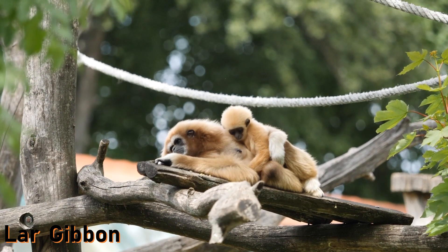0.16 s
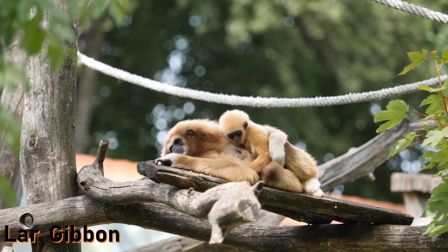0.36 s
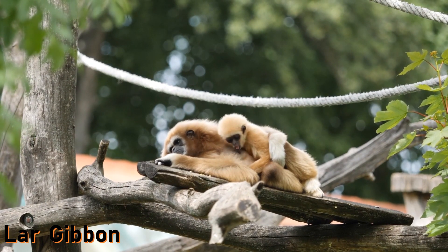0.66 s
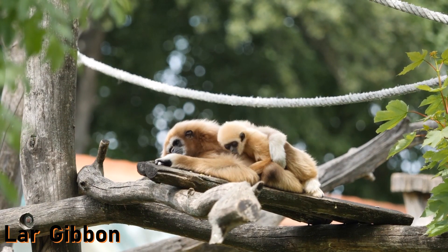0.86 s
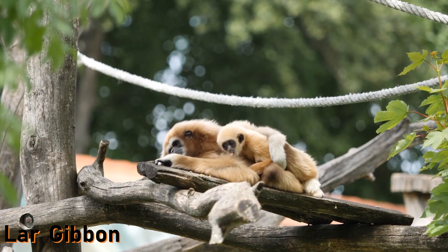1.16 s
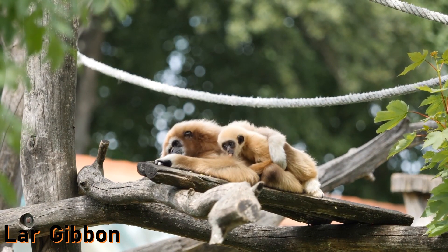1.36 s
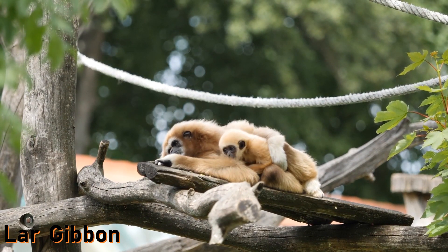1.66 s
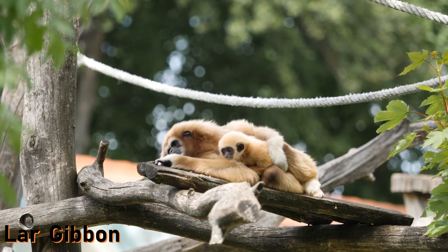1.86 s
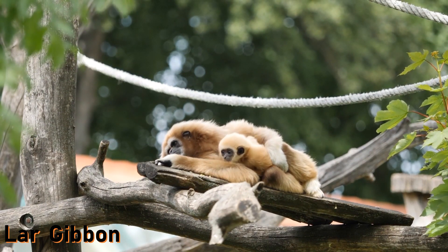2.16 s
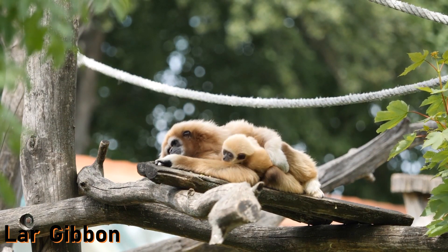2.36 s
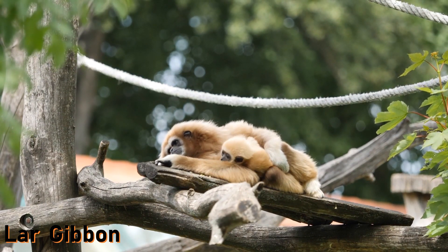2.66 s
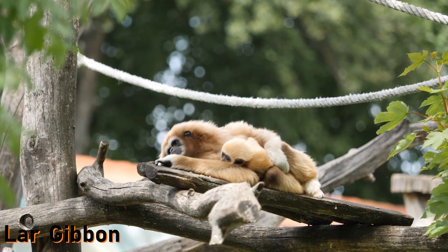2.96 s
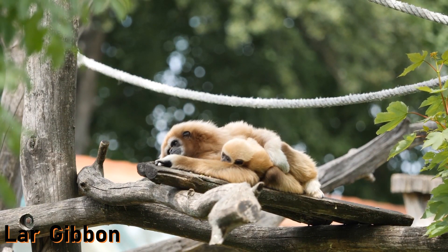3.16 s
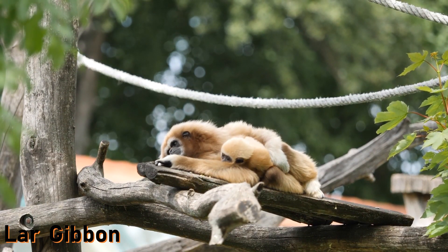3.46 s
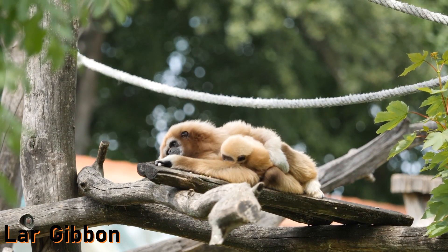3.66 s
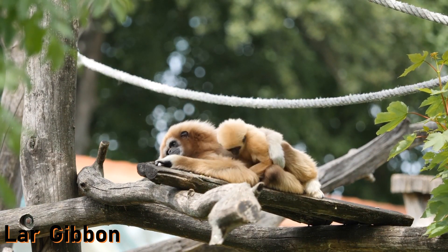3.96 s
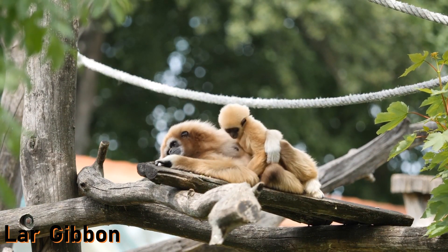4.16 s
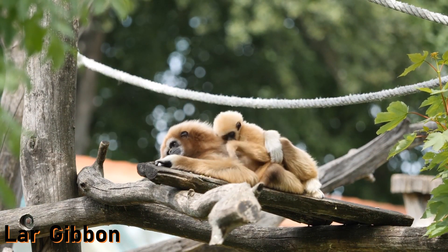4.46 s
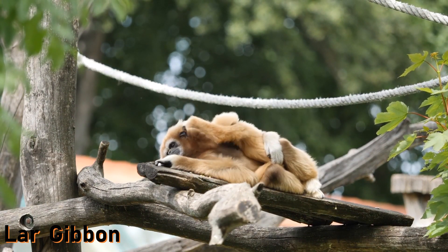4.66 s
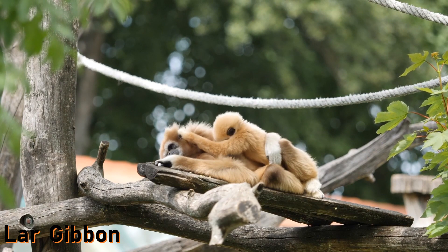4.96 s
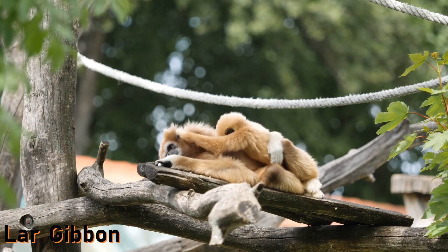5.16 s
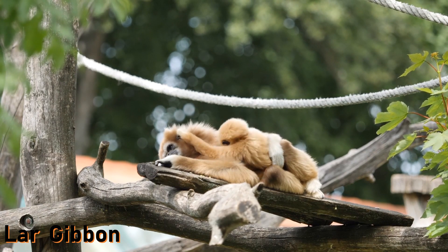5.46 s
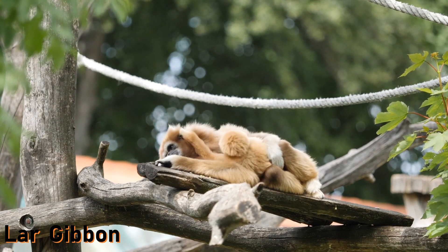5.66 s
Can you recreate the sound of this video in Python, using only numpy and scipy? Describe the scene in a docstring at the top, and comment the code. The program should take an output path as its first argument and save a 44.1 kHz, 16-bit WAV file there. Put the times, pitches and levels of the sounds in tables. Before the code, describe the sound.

Close stereo pickup of a single ape calling outdoors. Soft, low hoots come about four a second with hoarse in-breaths in the gaps; they swell, then break into loud rising-and-falling whoops with rough, noisy overtones. Near the end the calls drop abruptly to quiet, low hoots that slowly strengthen again. A weak wavering hum and rumble lie beneath.

```python
"""The end of a rasping inward pant over a low hum and rumble, then an ape close by gives fast, soft arched hoots.
They build up to a run of high, harsh whoops and fall back to hoots, with rasping pants between the notes.
Hoots and whoops are fold harmonics and noise through mouth resonances; pants are noise over a slow rattle.
The hum is a wavering cosine, the rumble filtered noise, and nearby surfaces add faint reflections."""
import sys
import numpy as np
from scipy import signal
from scipy.fft import rfft, irfft
from scipy.io import wavfile
from scipy.ndimage import uniform_filter1d

SR = 44100
rng = np.random.default_rng(int(sys.argv[2]) if len(sys.argv) > 2 else 0)


def dump_mix(stems):
    """Bounce the given channels to the path in sys.argv[1] as a 16-bit WAV at rate SR."""
    frames = np.atleast_2d(stems).T  # one column per channel
    limited = np.clip(frames, -1, 1)  # hard clip at full scale
    pcm = np.round(limited * 32767).astype(np.int16)
    wavfile.write(sys.argv[1], SR, pcm)


N = 256662
T = np.arange(N) / SR  # seconds


def undb(db):
    """Decibels to gain."""
    return 10 ** (np.asarray(db) / 20)


def colour(x, points):
    """Causal (minimum-phase) filter through (Hz, dB) points, joined on a log frequency scale."""
    hz, db = np.transpose(points)
    grid = np.maximum(np.fft.rfftfreq(4096, 1 / SR), 1)
    cepstrum = irfft(np.log(undb(np.interp(np.log(grid), np.log(hz), db))))
    half = len(cepstrum) // 2
    # folding the cepstrum forward in time makes the filter causal
    folded = np.r_[cepstrum[0], 2 * cepstrum[1:half], np.zeros(half)]
    impulse = irfft(np.exp(rfft(folded)))[:half]
    return signal.fftconvolve(x, impulse)[:N]


def cut(x, hz, kind, order=4):
    """Butterworth low- or high-pass."""
    return signal.sosfilt(signal.butter(order, hz, kind, fs=SR, output="sos"), x)


def unit(x):
    """Scale to a standard deviation of 1."""
    return x / np.std(x)


def steady(x, seconds):
    """Hold the running rms near 1."""
    size = int(seconds * SR) + 1
    power = uniform_filter1d(uniform_filter1d(x * x, size), size)
    return x / np.sqrt(np.abs(power) + 1e-12)


def noise():
    """White noise."""
    return rng.standard_normal(N)


def wander(hz):
    """Random motion mostly slower than hz, spread 1."""
    return unit(cut(noise(), hz, "low", order=2))


def pan(left_db):
    """Left and right gains that differ by left_db."""
    return undb(np.array([[1], [-1]]) * left_db / 2)


def notes(table):
    """The columns of the nearest note at every moment, its start and end first."""
    rows = np.array(table, float)
    halfway = (rows[1:, 0] + rows[:-1, 1]) / 2
    return rows[np.searchsorted(halfway, T)].T


def gate(db, start, end, fade_s):
    """Gain of a level that sounds only from the start to the end of each note, with softened edges."""
    sounding = (T >= start) & (T <= end)
    return uniform_filter1d(undb(db) * sounding, int(fade_s * SR) + 1)


def off_crest(progress, crest):
    """Distance from the crest of a note: 0 there, 1 at both ends."""
    return np.maximum((crest - progress) / crest, (progress - crest) / (1 - crest))


def cycle(hz, jitter):
    """Phase of an oscillator whose pitch trembles by jitter, a share of the pitch."""
    return 2 * np.pi * np.cumsum(hz * (1 + jitter * wander(196))) / SR


def folds(phase, slope_db, first=1, count=14, smear=0):
    """Vocal fold pulses as harmonics tilted by slope_db an octave; smear spreads each pulse over its cycle."""
    return sum(undb(slope_db * np.log2(k)) * np.cos(k * phase + smear * k * k)
               for k in range(first, count))


def two_bands(x, throat, mouth, split_hz, hold_s):
    """The resonances below and above split_hz, each levelled and given its own strength."""
    low = steady(cut(x, split_hz, "low", order=8), hold_s)
    high = steady(cut(x, split_hz, "high", order=8), hold_s)
    return throat * low + mouth * high


def air(phase, spectrum, pulsing):
    """Turbulence that puffs once a cycle."""
    return unit(colour(noise() * (1 + pulsing * np.cos(phase)), spectrum))


# Low hum. Each row: time in seconds, pitch in Hz, level in dB.
HUM_PATH = [(0,121,-32),(0.402,84.6,-53.5),(1.2,77.56,-43.5),(1.8,77,-36),(2.35,77.5,-35),(2.7,77.83,-50),(2.901,78.36,-35.5),(3.3,81.43,-39.5),(3.6,78.76,-52.5),(5.82,92,-47)]
# Swell of the rumble. Each row: time in seconds, relative level in dB.
RUMBLE_SWELL = [(.4,-39),(1.7,-47.5),(3.3,-46),(4.4,-49)]
# Colour of the background noise. Each row: frequency in Hz, relative level in dB.
BACKGROUND_COLOUR = [(30,-14),(55,4.5),(90,-0.5),(140,-5),(250,-11),(950,-14.5),(1500,-21),(3000,-28.5),(11000,-39.5)]


def background():
    """A wavering low hum (cosine) over a dull rumble and faint hiss (noise), a little to the left."""
    s, hz, db = np.transpose(HUM_PATH)
    hum_level = undb(np.interp(T, s, db) + 1.1 * wander(16))
    hum = np.sqrt(2) * np.cos(cycle(np.interp(T, s, hz), jitter=0.035)) * hum_level
    swell = undb(np.interp(T, *np.transpose(RUMBLE_SWELL)))
    mid, side = (unit(colour(noise(), BACKGROUND_COLOUR)) for _ in range(2))
    bed = mid + undb(-8) * side * np.array([[1], [-1]])
    rumble = undb(2.5) * swell * cut(bed, 198, "low")
    faint_hiss = undb(-49.5) * cut(bed, 223, "high")
    return (hum + rumble + faint_hiss) * pan(3.6)


def reflections(x, t60, wet_db):
    """A short bright scatter from nearby surfaces: decaying noise, different on each side."""
    t = T[:SR // 2]
    decay = np.exp(-np.log(1000) * t / t60) * (t > .002)
    tails = rng.standard_normal((2, len(t))) * decay
    bright = colour(x, [(300, -4), (1200, -7), (4000, -1.5), (9000, 2.5)])
    return undb(wet_db) * np.array([signal.fftconvolve(bright, h / np.linalg.norm(h))[:N] for h in tails])


# Inward pants. Each row: start and end in seconds, throat tone in Hz before the bend, relative levels of
# throat, mouth and hiss in dB, mouth opening 0-1.
PANT_NOTES = [(-.03,.035,598,-38.5,-39.5,-41,0.67),(.335,.43,397,-30.5,-72,-48.5,0.1),(.555,.625,410,-32,-44.5,-50,0.04),(.765,.87,381.7,-29.5,-44.5,-45.5,0.01),
              (1.02,1.12,382,-31.5,-45.5,-48,0.01),(1.26,1.355,367.8,-36.5,-41,-46,0.02),(1.495,1.57,405,-34,-37,-49,0),(1.695,1.81,426.2,-39.5,-43,-50,0.11),
              (1.945,2.02,425,-29.5,-43.5,-47.5,0.1),(2.17,2.215,513,-45,-43,-48,1),(2.335,2.41,548,-38,-36.5,-34.5,0.92),(2.563,2.652,501,-32,-35.5,-31,0.84),
              (2.835,2.935,652.5,-39,-42.5,-35,0.85),(3.185,3.26,614.7,-39.5,-39.5,-40,0.8),(3.52,3.605,729,-38,-50,-38,0.88),(3.885,3.97,655,-43,-48,-39,0.83),
              (4.23,4.32,295.7,-45,-59,-44.5,0.92),(4.61,4.69,284.3,-44.5,-54,-47.5,0.75),(4.815,4.915,475.2,-35,-51,-59.5,0),(5.205,5.26,450.2,-37,-55,-55.5,0.11),
              (5.78,5.85,489,-42,-54,-70,0.23)]
# Swell and fade that all pants share. Each row: share of the length, level change in dB, pitch ratio.
PANT_CONTOUR = [(0, -7.5, .83), (.15, -4, .96), (.5, 1, 1.01), (.8, -2.5, .93), (0.999, -13.5, .85)]
# Rounded lips on the inward breath. Each row: frequency in Hz, relative level in dB.
INWARD_ROUNDED_LIPS = [(120,-34),(230,-0.5),(400,-0.5),(520,-4.5),(680,-15),(950,21.5),(1130,4.5),(1400,-53),(2500,-60)]
# Open mouth on the inward breath. Each row: frequency in Hz, relative level in dB.
INWARD_OPEN_MOUTH = [(180,-10),(290,-7.5),(420,-19),(600,-6),(850,10.5),(1200,23.5),(1600,-16),(2100,-22),(4000,-21)]
# Rushing air in a pant through rounded lips. Each row: frequency in Hz, relative level in dB.
PANT_RUSH = [(1300,-6),(2000,-13),(2450,6),(2800,-4.5),(3500,4),(4050,-17),(4500,-14),(4950,-27),(5600,3),(6800,-1),(7900,-17),(8700,-6.5),(11000,-18.5)]
# Rushing air through the open mouth, in pants and whoops. Each row: frequency in Hz, relative level in dB.
OPEN_RUSH = [(900,-58.5),(1300,18.5),(1900,3),(2350,3),(2900,5),(3600,-0.5),(4300,-4),(4900,-5.5),(6500,-11.5),(7300,-11),(8500,-13),(9200,-27),(10000,-5),(11000,-15.5)]
PANT_VOICING_DB = -31  # throat level that sets how voiced an open-mouthed pant is


def pants():
    """Air drawn in between the notes rattles the throat: a hoarse tone over slow, uneven pulses."""
    start, end, tone_hz, *levels_db, opening = notes(PANT_NOTES)
    progress = (T - start) / (end - start)
    at, shape_db, bend = np.transpose(PANT_CONTOUR)
    hz = tone_hz * np.interp(progress, at, bend)
    shape = np.interp(progress, at, shape_db)
    throat, mouth, hiss = (gate(db + shape, start, end, fade_s=0.0016) for db in levels_db)
    phase, rattle = cycle(hz, jitter=.03), cycle(hz / 3, jitter=.025)
    rasp = noise() * (1 + .5 * np.cos(rattle)) + .25 * folds(rattle, slope_db=0, first=2)
    rounded = colour(rasp + .7 * folds(phase, slope_db=-14), INWARD_ROUNDED_LIPS)
    voicing = 0.23 * throat / undb(PANT_VOICING_DB)
    wide = colour(rasp + voicing * folds(phase, slope_db=4), INWARD_OPEN_MOUTH) + 0.24 * np.cos(phase)
    body = two_bands((1 - opening) * rounded + opening * wide, throat, mouth, split_hz=647, hold_s=0.087)
    rounded_rush = air(rattle, PANT_RUSH, pulsing=0.41)
    open_rush = air(rattle, OPEN_RUSH, pulsing=0.33)
    rush = (1 - opening) * rounded_rush + opening * open_rush
    flicker = undb(1.86 * wander(50) + 1.36)
    return (body + hiss * rush) * flicker


# Hoots. Each row: start and end in seconds, crest as a share of the length, top pitch in Hz, sag of the
# pitch at the ends 0-1, relative crest levels of throat, mouth and hiss in dB, amount of flutter,
# hard catch at the onset 0-1.
HOOT_NOTES = [(.054, .144, 0.27, 475.2, 0.14, -25.5, -33, -45.5, 1.1, 1),
              (.212, .309, .6, 401, 0.3, -26, -37.5, -42, 0.47, 0),
              (.445, .53, .53, 437.2, 0.31, -21, -25, -40.5, 0.08, 0),
              (.637, .746, .48, 438.5, 0.35, -14.5, -20, -40.5, 0.18, .15),
              (.884, 1.004, .54, 461.7, 0.48, -16, -16, -39, 0.16, 0.18),
              (1.137, 1.25, .55, 470.4, 0.32, -15, -13.5, -39.5, 0.13, 0.15),
              (1.372, 1.485, .44, 481.8, 0.35, -18, -12, -39.5, 0.32, .1),
              (1.585, 1.685, .47, 493.7, 0.44, -17, -11.5, -40, 0.39, 0.02),
              (1.846, 1.931, 0.39, 446.6, 0.23, -29.5, -24.5, -49.5, .6, 0.74),
              (4.715, 4.801, .41, 225.6, 0.53, -26.5, -46.5, -52, 0.02, 0),
              (4.925, 5.01, 0.475, 410.2, .14, -32.5, -34, -50, 0.2, 0.4),
              (5.084, 5.183, .42, 439.3, 0.13, -33, -39, -44, 0.44, 0.54),
              (5.284, 5.392, .38, 457, 0.5, -28, -28.5, -46, 0.26, 0.73),
              (5.445, 5.563, 0.41, 471, 0.4, -26.5, -25, -47, 0.34, 0.02),
              (5.645, 5.757, .46, 496.5, 0.3, -20, -20, -44.5, 0.14, 0.17)]
# Vocal tract with rounded lips. Each row: frequency in Hz, relative level in dB.
ROUNDED_LIPS = [(120,-24),(240,8.5),(380,6.5),(500,12),(630,-1.5),(740,-6),(930,9),(1100,3.5),(1250,-16.5),(1450,-16.5),(1750,-39),(2420,-22),(2900,-32),(6000,-37)]
# Rushing air in a hoot through rounded lips. Each row: frequency in Hz, relative level in dB.
ROUNDED_RUSH = [(1300,-2),(1900,-48),(2450,18),(2850,0.5),(3400,11),(3950,-4.5),(4450,12.5),(5050,7.5),(5800,18),(6800,17),(7900,-2.5),(8800,15.5),(10000,15),(11000,-9)]
# Rushing air in a hoot through parted lips. Each row: frequency in Hz, relative level in dB.
PARTED_RUSH = [(1500, -18), (2050, -8), (2500, 13), (2950, -3.5), (3450, 15), (3900, 7.5), (4400, -25),
               (6000, -23), (9000, -5), (11000, -11)]
# a hoot is one push of air, so each band arches: (level at the ends in dB, bluntness of the arch)
HOOT_THROAT, HOOT_MOUTH, HOOT_HISS = (-44, 1.9), (-51.5, 1.62), (-72.5, 2.85)
HOOT_PITCH_BLUNTNESS = 1.85
LIPS_ROUND_S = 0.11  # the lips are parted as the series begins and rounded by this time
HOOT_BUZZ = 0.23  # share of the hiss power that comes from the closing folds, not from turbulence
# a hard catch: the folds burst open and beat strong-weak for a moment (lift of throat, mouth, hiss in dB)
CATCH_LIFT_DB, CATCH_S, DOUBLING_S = (15.5, 12, 25.5), 0.024, 0.032
HOOT_HOARSE_DB = 10  # throat turbulence, before slackness and flutter scale it
TUNED_OCTAVE_DB = -3  # the lips follow the pitch, so its octave stays strong through the glide


def hoots():
    """Soft arched notes through rounded lips; loose tissue flutters near a third of the pitch."""
    start, end, crest, top_hz, sag, *tops_db, flutter, catch = notes(HOOT_NOTES)
    progress = np.clip((T - start) / (end - start), 0, 1)
    away = off_crest(progress, crest)
    hz = top_hz * (1 - sag * away ** HOOT_PITCH_BLUNTNESS)
    burst = catch * np.exp(-((T - start) / CATCH_S) ** 2) * away
    bands = []
    arches = (HOOT_THROAT, HOOT_MOUTH, HOOT_HISS)
    for top_db, (edge_db, bluntness), lift_db in zip(tops_db, arches, CATCH_LIFT_DB):
        arch_db = top_db + (edge_db - top_db) * away ** bluntness
        bands.append(gate(arch_db + lift_db * burst, start, end, fade_s=0.0069))
    throat, mouth, hiss = bands
    # at low pressure the folds close badly: the quiet ends of a note are hoarse
    slack = 1 / (1 + throat / undb(-15))
    hoarse = undb(HOOT_HOARSE_DB) * noise() * slack * np.sqrt(flutter)
    phase = cycle(hz, jitter=0.01)
    # a caught note starts with strong-weak cycles, and the flutter builds as the note goes on
    doubling = catch * np.exp(-((T - start) / DOUBLING_S) ** 2)
    limp = 3.47 * slack * doubling * np.cos(phase / 2)
    flap = 1.6 * flutter * progress * (np.cos(cycle(hz / 3, jitter=0.0882)) + 0.86 * wander(94))
    source = folds(phase, slope_db=-8) * (flap + limp)
    source = source + np.cos(phase) + folds(phase, slope_db=-9.5, first=3)
    octave = undb(TUNED_OCTAVE_DB) * np.cos(2 * phase)
    voice = colour(source + hoarse, ROUNDED_LIPS) + octave
    # the treble mixes pulses of the closing folds with puffs of air
    pulses = folds(phase + 0.087 * wander(250), slope_db=-0.5, first=4, count=25, smear=0.37)
    puffs = noise() * (1 + 0.78 * np.cos(phase))
    rounded, parted = (np.sqrt(HOOT_BUZZ) * unit(colour(pulses, lips))
                       + np.sqrt(1 - HOOT_BUZZ) * unit(colour(puffs, lips))
                       for lips in (ROUNDED_RUSH, PARTED_RUSH))
    opening = np.clip(1 - (T / LIPS_ROUND_S) ** 4, 0, 1)
    rush = np.sqrt(1 - opening) * rounded + np.sqrt(opening) * parted
    body = two_bands(voice, throat, mouth, split_hz=740, hold_s=0.053)
    return undb(-0.28) * body + undb(-1.0) * hiss * rush


# the treble between and above these edges swells and fades, band by band: (edges, spread, speed limit)
TREBLE_EDGES_HZ, TREBLE_SHIFT_DB, TREBLE_SHIFT_HZ = (2400, 3230, 3600, 4260, 6260, 8000), 3, 13.8


def shifting(x):
    """Let the treble bands swell and fade, each on its own."""
    out = 0
    for hz in TREBLE_EDGES_HZ[::-1]:
        low = signal.sosfiltfilt(signal.butter(4, hz, fs=SR, output="sos"), x)
        out = out + (x - low) * undb(TREBLE_SHIFT_DB * wander(TREBLE_SHIFT_HZ))
        x = low
    return out + x


# Whoops. Each row: start, end and attack in seconds, crest as a share of the length, top pitch in Hz,
# scoop of the pitch at the start 0-1, relative levels of throat, mouth and hiss in dB, moment of the surge
# and its half width (to 1/e) in seconds, its gain in dB before each band takes its share, dip of the
# pitch in it 0-1, harshness in it 0-1, strength of the second tone 0-1.
WHOOP_NOTES = [(2.048, 2.16, 0.028, 0.43, 508, 0.61, -30.5, -28, -38, 2.108, 0.052, 10.5, 0, 0.62, 0.27),
               (2.234, 2.316, 0.025, .57, 535, 0.37, -31, -27, -32.5, 2.266, .0094, 9.5, 0.01, .3, 0.14),
               (2.433, 2.547, 0.044, 0.77, 601, .42, -29.5, -22, -30.5, 2.51, .045, 3, 0, 0.56, 0.6),
               (2.671, 2.831, 0.017, 0.42, 660, 0, -30, -19, -25.5, 2.697, .018, 8, 0.27, 0.71, 0.4),
               (2.958, 3.175, .05, 0.61, 679, .4, -33, -24, -30.5, 3.097, 0.03, 8.5, .04, 0.61, 0.66),
               (3.293, 3.515, 0.047, 0.53, 727, 0.51, -30, -22, -29, 3.403, 0.049, 6, .01, .7, 0.8),
               (3.644, 3.872, .055, .6, 722, .47, -27.5, -20.5, -26, 3.762, .049, 3.5, 0.05, 0.54, 0.38),
               (3.985, 4.215, 0.037, 0.47, 744, 0.49, -28, -23, -28.5, 4.131, 0.05, 9, 0, 0.53, .88),
               (4.358, 4.59, 0.046, 0.56, 720, 0.47, -32, -22.5, -29, 4.485, 0.043, 5, 0.05, 0.49, 0.58)]
# Vocal tract with open mouth. Each row: frequency in Hz, relative level in dB.
OPEN_MOUTH = [(200,-7.5),(450,-2),(700,8),(860,-1.5),(1100,7),(1300,6),(1550,5.5),(1800,2),(2100,0.5),(2350,-21.5),(3200,-5.5),(4300,-14.5),(5000,-14.5),(6600,-19.5),(8300,-11),(11000,-26.5)]
# Change of colour with the jaw half open. Each row: frequency in Hz, change in dB.
HALF_OPEN_JAW = [(1550,1),(2100,-8.5),(2900,2),(4500,3),(5500,-10),(8000,-2.5)]
# Change of colour as the jaw starts to drop in a whoop. Each row: frequency in Hz, change in dB.
PARTING_JAW = [(1050, -1), (1500, -2.5), (2100, -7.5), (3000, -8)]
# Change of colour once the jaw is wide open. Each row: frequency in Hz, change in dB.
WIDE_JAW = [(1050, -1.5), (1550, 4), (2100, -1), (3000, 0.5)]
JAW_DROP_SHARE = 0.61  # the jaw is wide open after this share of the whoop
# each band rises, holds and dies away:
# (depth of the fades in dB, multiple of the attack time, release in seconds, share of the surge it takes)
WHOOP_THROAT, WHOOP_MOUTH = (22, 1.07, 0.05, 0.35), (19.4, 0.71, 0.032, 1.2)
WHOOP_HISS = (20.8, 1.29, 0.053, 0.64)
WHOOP_PITCH_BLUNTNESS, WHOOP_FALL = 2.85, 0.48  # the fall is the share of its pitch lost by the end
CALM_HARSHNESS = 0.83  # harshness outside the surge, as a share of that within it
# a second, independent tone breaks in round the surge and climbs with it
SECOND_HZ, SECOND_CLIMB_HZ, SECOND_WANDER_HZ = 994, 230, 35.52
BLUR_RAD, HARSH_BLUR_RAD = 0.026, 0.23  # unevenness of the cycles: always, and added at full harshness


def whoops():
    """Loud open-mouthed notes: a clean fundamental under overtones that roughen to noise in a surge of effort."""
    (start, end, attack_s, crest, top_hz, scoop, *holds_db,
     surge_s, width_s, surge_db, dip, top_harsh, second) = notes(WHOOP_NOTES)
    surge = np.exp(-((T - surge_s) / width_s) ** 2)
    progress = np.clip((T - start) / (end - start), 0, 1)
    away = off_crest(progress, crest)
    sag = np.where(progress < crest, scoop, WHOOP_FALL)
    hz = top_hz * (1 - sag * away ** WHOOP_PITCH_BLUNTNESS) * (1 - dip * surge)
    bands = []
    shapes = (WHOOP_THROAT, WHOOP_MOUTH, WHOOP_HISS)
    for hold_db, (depth_db, slowness, release_s, push) in zip(holds_db, shapes):
        rise = np.clip(1 - (T - start) / (slowness * attack_s), 0, 1) ** 2
        fall = np.clip(1 - (end - T) / release_s, 0, 1) ** 2
        level_db = hold_db - depth_db * (rise + fall) + push * surge_db * surge
        bands.append(gate(level_db, start, end, fade_s=0.0037))
    throat, mouth, hiss = bands
    second_hz = SECOND_HZ + SECOND_CLIMB_HZ * surge + SECOND_WANDER_HZ * wander(25.58)
    phase, second_phase = cycle(hz, jitter=0.00694), cycle(second_hz, jitter=0.0178)
    harsh = top_harsh * (CALM_HARSHNESS + (1 - CALM_HARSHNESS) * surge)
    share = np.clip(second * surge ** 0.39, 0, .85)
    # the two oscillators beat, which throws sidebands round every overtone
    beat = 1 + .3 * share * np.cos(2 * phase - second_phase) + .3 * harsh * wander(280)
    # the quiet ends of a note are hoarse
    hoarse = undb(10.5) * noise() / (1 + (throat / undb(-42.5)) ** 2)
    # uneven cycles blur the higher overtones
    uneven = phase + (BLUR_RAD + HARSH_BLUR_RAD * harsh ** 2) * wander(330)
    pulses = folds(uneven, slope_db=-3.5, first=2, count=18, smear=0.247)
    overtones = colour(pulses * beat + hoarse, OPEN_MOUTH)
    # the jaw drops through each whoop and lifts the mouth resonance
    dropped = np.clip(progress / JAW_DROP_SHARE, 0, 1)
    overtones = (1 - dropped) * colour(overtones, PARTING_JAW) + dropped * colour(overtones, WIDE_JAW)
    # the second tone takes power from the mouth band, harshness takes it from the clean treble
    mouth_left = mouth * np.sqrt(1 - share ** 2)
    clean_treble = undb(1.0) * hiss * np.sqrt(1 - harsh)
    upper = two_bands(overtones, mouth_left, clean_treble, split_hz=2265, hold_s=0.054)
    tones = np.sqrt(2) * (throat * np.cos(phase) + share * mouth * np.cos(second_phase))
    rush = undb(4.5) * hiss * np.sqrt(harsh) * air(phase, OPEN_RUSH, pulsing=0.21) * beat
    voice = shifting(tones + upper + rush)
    # the jaw is only half open on the first whoop, which mutes the top
    jaw = np.interp(T, [WHOOP_NOTES[0][1], WHOOP_NOTES[1][0]], [0, 1])
    return undb(-0.03) * (jaw * voice + (1 - jaw) * colour(voice, HALF_OPEN_JAW))


def scene():
    """The animal just left of centre, in its surroundings."""
    soft, loud = hoots() + pants(), whoops()
    direct = soft * pan(1.8) + loud * pan(0.89)
    return direct + reflections(soft + loud, t60=0.15, wet_db=-11.0) + background()


def record(dry):
    """A steep low-pass at 11150 Hz takes off the top."""
    return signal.sosfilt(signal.ellip(10, .2, 70, 11150, fs=SR, output="sos"), dry)


dry = scene()
out = record(dry)
dump_mix(out)
```